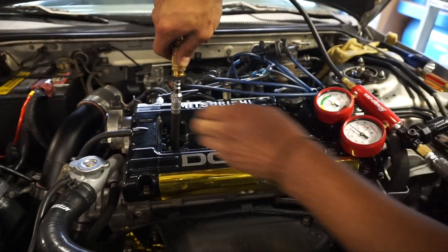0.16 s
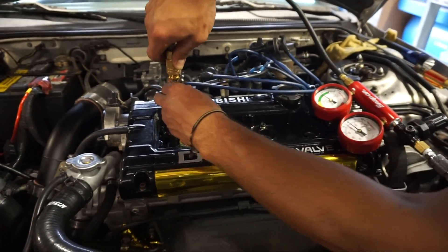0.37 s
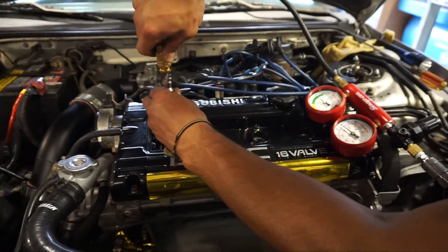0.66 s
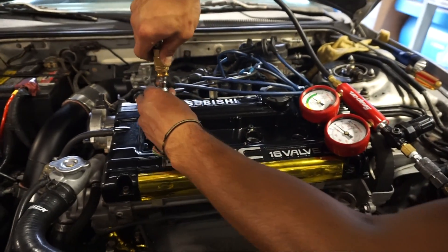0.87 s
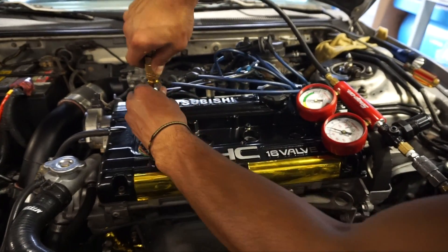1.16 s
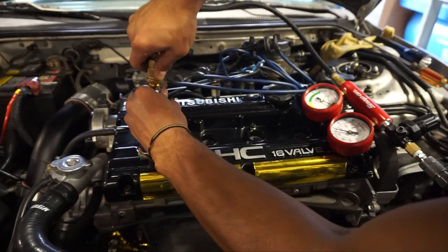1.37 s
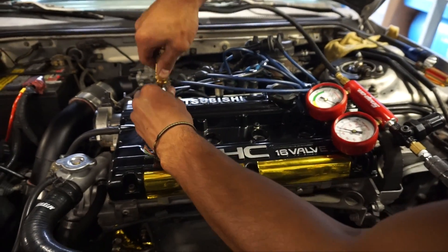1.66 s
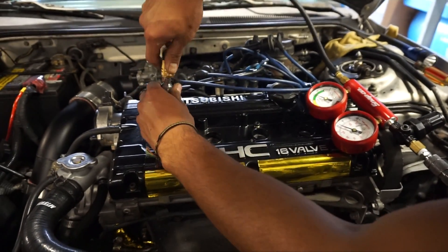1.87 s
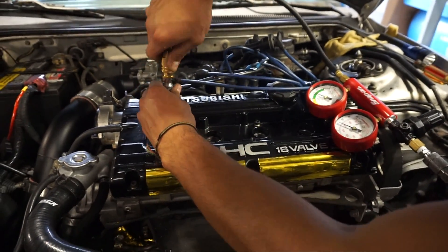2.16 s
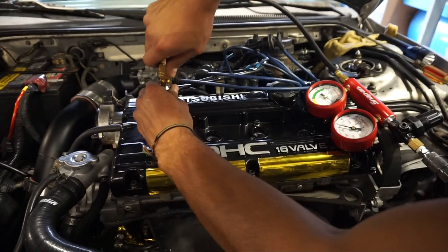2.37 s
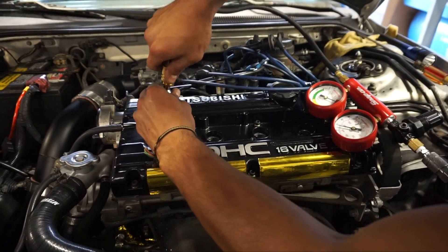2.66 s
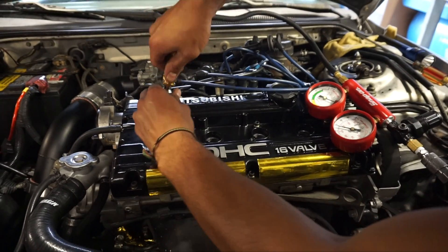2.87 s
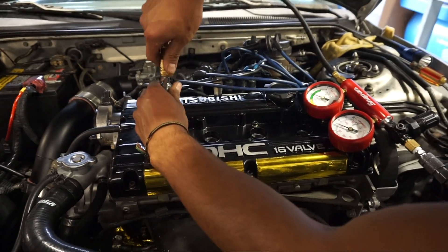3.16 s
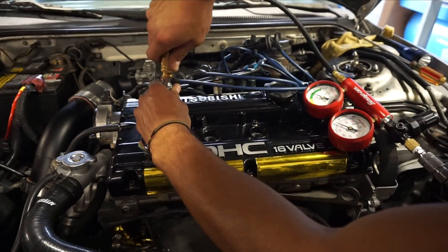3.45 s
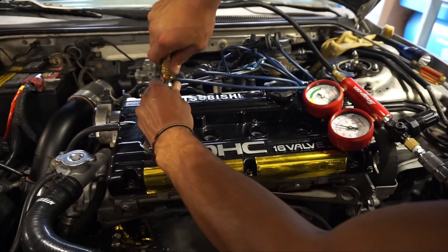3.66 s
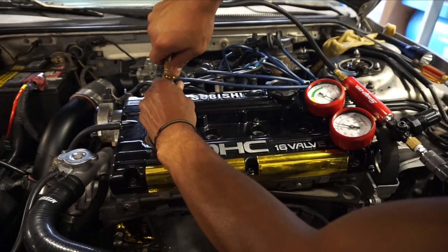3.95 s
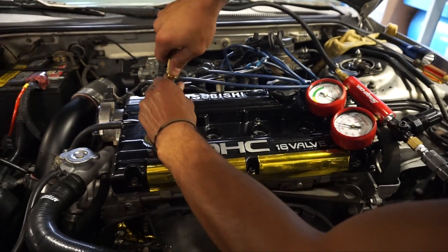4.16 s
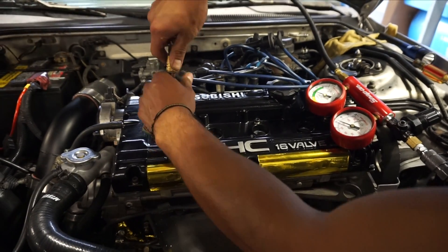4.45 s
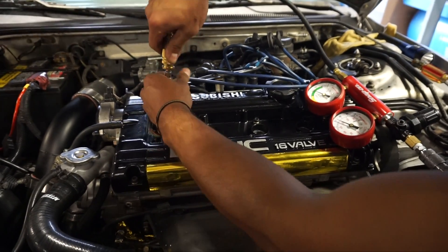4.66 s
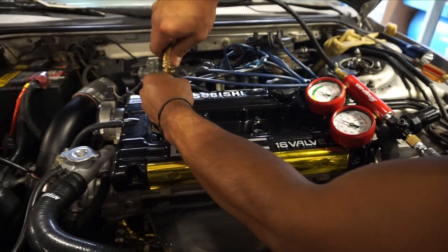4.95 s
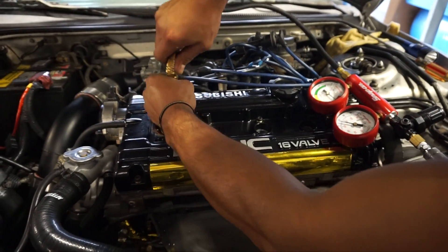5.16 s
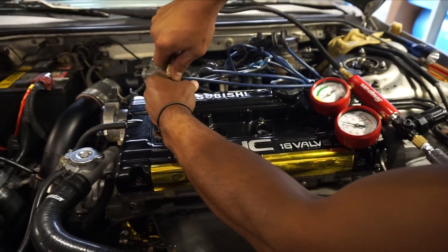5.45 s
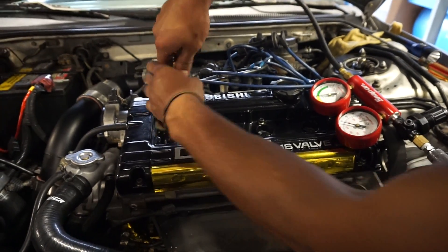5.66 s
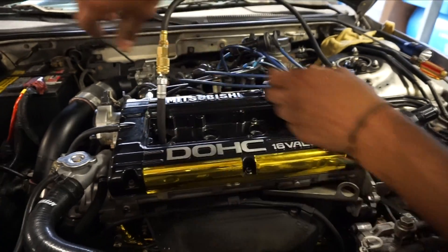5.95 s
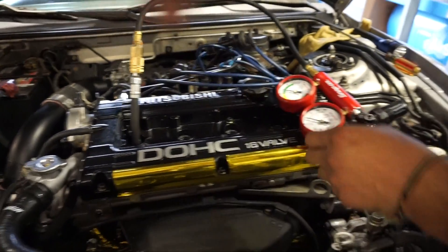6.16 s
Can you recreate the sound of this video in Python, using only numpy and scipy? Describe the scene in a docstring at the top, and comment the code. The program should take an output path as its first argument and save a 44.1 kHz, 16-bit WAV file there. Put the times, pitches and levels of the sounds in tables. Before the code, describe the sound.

In a workshop, a compressor drones steadily while fingers click a brass air coupler close to the microphone. Compressed air bursts out five times, the first two almost joined, the next two longer, the last very short. Crisp metallic ticks fall between the bursts. The first hiss makes the recording level drop, so the drone stays low afterwards. Each hiss ends abruptly with a light workshop echo.

```python
"""Air hose coupler in a workshop

Close to the microphone, fingers work the brass quick coupler of a leak-down tester's hose: it clicks
(filtered noise scrapes) and air escapes in five bursts (shaped noise), the first two almost joined.
Behind it a compressor drones: shaft tones over throbbing noise, with mains hum and a faint leak.
The first burst makes an automatic gain control turn down, so the drone drops away and stays low."""
import sys
import numpy as np
from scipy import signal
from scipy.fft import rfft, irfft, next_fast_len
from scipy.io import wavfile
from scipy.ndimage import uniform_filter1d, minimum_filter1d, map_coordinates

SR = 44100
rng = np.random.default_rng(int(sys.argv[2]) if len(sys.argv) > 2 else 0)


def file_out(sig):
    """Save sig as 16-bit WAV at sys.argv[1]."""
    # one column per channel
    cols = np.atleast_2d(sig).T
    # limit, then scale
    lim = np.clip(cols, -1, 1)
    pcm = np.round(lim * 32767).astype(np.int16)
    wavfile.write(sys.argv[1], SR, pcm)


N = 277697
TIME = np.arange(N) / SR
FFT_SIZE = next_fast_len(N, True) // 2 * 2
FREQS = np.fft.rfftfreq(FFT_SIZE, 1 / SR)
EDGE_HZ = 15800  # upper band limit
SIDES = np.array([[.5], [-.5]])  # shares a left-right difference between the two channels

# clicks and scrapes of the coupler: t/s, level/dB, brightest f/Hz, decay/s
CLICKS = [(.536, -35, 9000, 0.032), (.584, -22, 5760, .0089), (0.8183, -10.5, 4450, 0.0033),
          (0.8196, -19, 13000, .0038), (.951, -24.5, 6700, .0097), (1.043, -24, 12000, .005),
          (1.055, -12, 8500, 0.0063), (1.0594, -5.5, 5330, 0.0046), (2.008, -24, 7000, .005),
          (2.101, -24.5, 8050, .011), (2.113, -17, 10000, .005), (2.135, -26, 11000, .007),
          (2.2116, -19, 7000, 0.0063), (2.224, -26, 11000, .0057), (3.167, -27, 10000, 0.0043),
          (3.226, -26, 13500, 0.0082), (3.258, -14.5, 15000, 0.0045), (3.284, -13.5, 10000, 0.0037),
          (3.3185, -23, 10000, 0.0028), (4.357, -23, 9000, .006), (4.69, -30, 9000, .004),
          (4.874, -25, 6640, .0044), (4.9062, -25, 15000, .003), (5.452, -16.5, 9600, 0.0027)]


def gain_of(db):
    """Amplitude factor of a level in dB."""
    return 10 ** (np.asarray(db) / 20)


def evened(x):
    """The signal scaled to rms 1."""
    return x / np.sqrt(np.mean(x ** 2) + 1e-20)


def read(points, hz):
    """A table of (f/Hz, value) joined on a log-frequency axis."""
    f, value = np.transpose(points)
    return np.interp(np.log(hz + 1), np.log(f + 1), value)


def follow(points):
    """A table of (t/s, value) joined by straight lines at every sample."""
    s, value = np.transpose(points)
    return np.interp(TIME, s, value)


def peaks(modes, hz):
    """Summed gain of steep-sided resonances: f/Hz, width/Hz, level/dB."""
    return sum(gain_of(db) / (1 + ((hz - f) / width * 2) ** 2) ** 1.5 for f, width, db in modes)


def waver(hz):
    """Slow random curve of rms 1, moving at up to about the given rate."""
    spectrum = rfft(rng.standard_normal(N), FFT_SIZE)
    return evened(irfft(spectrum / (1 + (FREQS / hz) ** 4))[:N])


def noise(density):
    """Two partly alike channels of noise with the given amplitude per root Hz."""
    # left-right likeness: f/Hz, likeness 0-1
    likeness = [(25, .5), (70, 1), (250, 1), (700, 0.94), (1200, 0.65), (4000, 0.43), (5300, 0.04),
                (6600, 0.48), (9500, 0.61), (11500, 0.35), (13500, 0.44), (15500, 0.41)]
    a, b = rfft(rng.standard_normal((2, FFT_SIZE)))
    same = read(likeness, FREQS)
    pair = np.array([a, same * a + np.sqrt(1 - same ** 2) * b])
    return irfft(pair * density)[:, :N] * np.sqrt(SR / 2)


def air(flicker_db=0.56, rush_flicker_db=0.5, split_hz=12500):
    """Escaping air: a shrill turbulent jet and a broad rush, part of which sounds through the hose."""
    # thin jet of the air: f/Hz, level/dB per Hz
    jet_colour = [(200, -100), (1200, -76), (2600, -69.5), (4700, -60), (6200, -63), (8000, -49),
                  (9500, -47), (11800, -42), (13300, -42.5), (14900, -40), (17500, -73)]
    # broad rush of the air: f/Hz, level/dB per Hz
    rush_colour = [(100, -95), (600, -89), (1200, -72), (2000, -62.5), (2800, -58), (4000, -54),
                   (4700, -54.5), (6500, -52), (9000, -53), (16000, -83)]
    # resonances of the hose: f/Hz, width/Hz, level/dB per Hz
    hose_modes = [(1220, 230, -61.5), (2080, 370, -56), (2625, 260, -47), (3140, 370, -48),
                  (3810, 170, -45.5), (4300, 300, -47), (4735, 120, -42), (5390, 410, -45),
                  (5800, 160, -49.5), (6390, 540, -46.5), (7330, 170, -42), (8010, 280, -39.5),
                  (8500, 150, -40), (9400, 200, -39), (10800, 240, -48)]
    # bands the hose cancels: f/Hz, width/Hz, depth/dB
    hose_notches = [(3560, 200, -28), (4030, 90, -8), (4980, 170, -15), (6850, 550, -11), (7680, 170, -6),
                    (9150, 260, -5)]
    # how much of the air sounds through the hose: t/s, share 0-1
    hose_share = [(1.29, 1), (1.37, .05), (3.72, .03), (3.93, .65), (4.1, .15), (4.3, .05)]
    flow, pinch_db, tilt_db = gap()
    hollow = follow(hose_share)
    through_hose, direct = np.sqrt(hollow), np.sqrt(1 - hollow)
    notches = gain_of(sum(db * np.exp(-2 * ((FREQS - f) / width) ** 2) for f, width, db in hose_notches))

    shrill = gain_of(read(jet_colour, FREQS))
    jet = direct * noise(shrill) + through_hose * noise(shrill * notches)
    high_pass = signal.butter(2, split_hz, "high", fs=SR, output="sos")
    top = signal.sosfiltfilt(high_pass, jet)
    tilt = gain_of(tilt_db / 2)
    jet = top * tilt + (jet - top) / tilt

    rush = direct * noise(gain_of(read(rush_colour, FREQS)))
    rush = rush + through_hose * noise(peaks(hose_modes, FREQS) * notches)
    jet = jet * gain_of(pinch_db + flicker_db * waver(60))
    rush = rush * gain_of(rush_flicker_db * waver(40))
    return hand_echoes(flow * (jet + rush))


def gap():
    """Flow, pinch/dB and tilt/dB: a narrow gap makes a strong shrill jet, a wide one a duller jet."""
    # each time the coupler lets air out: opens t/s, shuts t/s, attack/s, flow level/dB,
    # pinch on opening/dB, pinch lasts/s, pinch on shutting/dB, gap widest t/s, widening 0-1
    bursts = [(1.147, 1.325, 0.002, 5, 6.5, .016, -0.5, 1.19, 0.4),
              (1.333, 1.797, 0.0024, 1.5, 9.5, 0.086, -0.5, 1.67, 0.66),
              (2.309, 3.011, 0.0028, 0, 17.5, .06, 3.5, 2.8, 0.13),
              (3.593, 4.319, .0026, -2.5, 10, 0.21, 5.5, 3.99, 1),
              (5.088, 5.217, 0.0054, 2, 14, .045, -3, 5.195, 1)]
    release_s = 0.004  # how fast the seal shuts
    shutting_s = 0.036  # spread of the pinch around the moment of shutting
    spit_lead_s, spit_s, spit_db = .019, 0.0034, -31  # thin spit as the seal first lifts
    wide_share, wide_flow_db = 0.18, -1  # spread of the widening as share of a burst; its flow change
    narrow_tilt_db = 2  # top of the jet over its lower part, with a narrow gap
    wide_tilt_db = -13.5  # change of that tilt at full widening
    flow, pinch_db, widening = np.zeros((3, N))
    for opens, shuts, attack_s, flow_db, opening_db, pinch_s, shutting_db, widest, width in bursts:
        opened = (1 + np.tanh((TIME - opens) / (2 * attack_s))) / 2
        unshut = (1 + np.tanh((shuts - TIME) / (2 * release_s))) / 2
        swell = np.exp(-((TIME - widest) / (wide_share * (shuts - opens))) ** 2)
        wide = width * opened * unshut * swell
        spit = gain_of(spit_db) * np.exp(-((TIME - opens + spit_lead_s) / spit_s) ** 2)
        flow += opened * unshut * gain_of(flow_db + wide_flow_db * wide) + spit
        away = np.maximum((TIME - opens) / pinch_s, (opens - TIME) / spit_lead_s)
        pinch_db += opening_db * np.exp(-away)
        pinch_db += shutting_db * np.exp(-((TIME - shuts) / shutting_s) ** 2)
        widening += wide
    return flow, pinch_db, narrow_tilt_db + wide_tilt_db * widening


def hand_echoes(x, drift=0.072):
    """Close reflections comb the hiss; the colour shifts as the hand moves and the delays drift."""
    # echoes off the hand and the valve cover: mean delay/ms, level/dB
    echoes = [(0.211, -29), (1.369, -12.5), (2.3, -9)]
    at, out = np.arange(N), x.copy()
    for ms, db in echoes:
        late = at - ms * SR / 1000 * (1 + drift * waver(1.2))
        out += gain_of(db) * np.array([map_coordinates(ear, [late], order=2) for ear in x])
    return out


def seal(seated_s=5.22, fade_s=.28):
    """Short dull puffs of noise past the seal, and a dying narrow-band whistle once it has seated."""
    # the seal spits as it shifts or seats: t/s, level/dB, length/s
    puff_times = [(1.292, -2, .018), (1.357, 10, 0.0054), (1.777, 0, 0.02), (2.994, 4, 0.021),
                  (4.307, -2.5, 0.017)]
    # colour of a puff: f/Hz, level/dB per Hz
    puff_colour = [(40, -100), (200, -70), (600, -55), (1300, -55.5), (3200, -47.5), (4500, -49),
                   (8000, -60), (16000, -75)]
    # thin whistle of the seated seal: f/Hz, width/Hz, level/dB per Hz
    whistle_modes = [(11980, 480, -60), (13150, 700, -69)]
    puffs = sum(gain_of(db) * np.exp(-2 * ((TIME - s) / length) ** 2) for s, db, length in puff_times)
    seep = (TIME > seated_s) * np.exp(-abs(TIME - seated_s) / fade_s)
    return puffs * noise(gain_of(read(puff_colour, FREQS))) + seep * noise(peaks(whistle_modes, FREQS))


def coupler(octaves=0.76, rise_s=0.0012, grit_db=1.5, body_db=-9, snap=2.4, snap_s=0.00023):
    """Each click is a snap and a short gritty scrape that ring the brass sleeve."""
    # resonances of the brass sleeve: f/Hz, width/Hz, level/dB
    brass_modes = [(2750, 340, 20), (3850, 520, 16.5), (4500, 580, 8.5), (6830, 450, 10), (7300, 310, 11),
                   (8080, 590, 10), (9200, 270, 9), (10490, 300, 10.5), (12930, 700, 12), (13700, 900, 7)]
    size = 4096  # samples per click
    t, hz = np.arange(size) / SR, np.fft.rfftfreq(size, 1 / SR)
    out = np.zeros((2, N + size))
    for s, db, bright_hz, decay in CLICKS + rattles():
        shared, left, right, grit = rng.standard_normal((4, size))
        contact = 1 / (1 + (np.log2((hz + 1) / bright_hz) / octaves) ** 2)
        contact += gain_of(body_db) * (4000 / bright_hz) ** 2  # dull blows also shake the body
        low_cut = hz ** 2 / (hz ** 2 + 600 ** 2)
        colour = (1 + peaks(brass_modes, hz)) * contact * low_cut * (hz < EDGE_HZ)
        ring = evened(irfft(rfft(shared + 1.04 * np.array([left, right])) * colour))
        roughness = gain_of(grit_db * evened(uniform_filter1d(grit, 40)))
        scrape = (1 - np.exp(-t / rise_s)) * np.exp(-t / decay) * roughness
        attack = snap * np.exp(-t / snap_s) * (bright_hz / 14000) ** 2  # bright clicks snap harder
        start = round(s * SR)
        out[:, start:start + size] += gain_of(db) * ring * (scrape + attack)
    return out[:, :N]


def rattles(after_s=(0.0076, 0.022), below_db=-13.5, bright_hz=10000, decay_s=0.0045):
    """The loose sleeve ticks once, weaker, at a random moment after each click; rows like CLICKS."""
    return [(s + rng.uniform(*after_s), db + below_db, bright_hz, decay_s) for s, db, _, _ in CLICKS]


def bumps(rise_s=0.0021):
    """Soft knocks as the hose bumps the engine: quickly damped sines."""
    # knocks of the hose: t/s, level/dB, f/Hz, decay/s
    knocks = [(.553, -53, 75, .02), (3.253, -32, 131, .02), (3.28, -19, 338, 0.013)]
    out = np.zeros(N)
    for s, db, hz, decay in knocks:
        t = np.maximum(TIME - s, 0)
        envelope = np.exp(-t / decay) * (1 - np.exp(-t / rise_s))
        out += gain_of(db) * np.sin(2 * np.pi * hz * t) * envelope
    return out


def workshop(x):
    """A diffuse tail for each ear, each band dying at its own speed."""
    # decay of the workshop: f/Hz, t60/s
    decay_times = [(200, 0.75), (2000, 1), (6000, 0.89), (15000, 0.38)]
    late_noise = rng.standard_normal((2, SR)) * (TIME[:SR] > .008)  # the tail starts after 8 ms
    hz, t, z = signal.stft(late_noise, SR, nperseg=256)
    fading = gain_of(-60 * t / read(decay_times, hz)[:, None])
    tail = signal.istft(z * fading, SR, nperseg=256)[1]
    return signal.fftconvolve(x, tail / np.linalg.norm(tail[0]), axes=1)[:, :N]


def compressor(shaft_hz=56.8, wander=0.00144, throb=0.058, knock=0.089, lean_db=-4.0, tones_lean_db=-2.5):
    """Shaft tones, the fourth steady and strong, over a clatter that throbs with the strokes."""
    # tones of the compressor: multiple of the shaft speed, rms level/dB
    shaft_tones = [(2, -57), (3, -50), (4, -30), (5, -45.5), (6, -50.5), (7, -49), (8, -38.5), (9, -70),
                   (10, -38), (11, -51), (12, -45), (13, -61), (14, -56), (17, -51.5), (35, -51.5),
                   (43, -53.5), (50, -52.5), (68, -55.5), (70, -54)]
    # clatter of air and casing: f/Hz, level/dB per Hz
    clatter_colour = [(25, -101), (55, -93), (84, -90), (106, -61), (145, -66.5), (200, -67), (380, -65.5),
                      (640, -59.5), (900, -68.5), (1500, -68.5), (2400, -72), (2850, -67.5), (3500, -75),
                      (3950, -76.5), (4600, -81.5), (8000, -91)]
    angle = 2 * np.pi * np.cumsum(shaft_hz * (1 + wander * waver(3.1))) / SR
    tones = np.zeros(N)
    for order, db in shaft_tones:
        flutter = .051 if order == 4 else .255  # rms share of the tone's level
        level = np.sqrt(2) * gain_of(db) * (1 + flutter * waver(9.4))
        tones += level * np.cos(order * angle + 2 * np.pi * rng.random())
    strokes = 1 + throb * np.cos(4 * angle) + knock * (np.cos(angle) + np.cos(2 * angle))
    clatter = evened(strokes) * noise(gain_of(read(clatter_colour, FREQS)))
    return tones * gain_of(tones_lean_db * SIDES) + clatter * gain_of(lean_db * SIDES)


def mains_hum(mains_hz=120, rms_db=-54):
    """A plain sine hum, equal in both channels."""
    return np.sqrt(2) * gain_of(rms_db) * np.sin(2 * np.pi * mains_hz * TIME)


def tester_leak():
    """The faint leak of the tester: a soft noise floor."""
    # colour of the leak: f/Hz, level/dB per Hz
    leak_colour = [(60, -115), (1000, -87), (5000, -91), (8000, -85), (12000, -81.5), (14000, -81),
                   (16000, -88)]
    return noise(gain_of(read(leak_colour, FREQS)))


def scene(room_db=-23):
    """The coupler close by, its echo in the workshop, and the background swelling and sinking behind."""
    # swell of the whole background: t/s, level/dB
    drone_swell = [(0, 1), (.45, -1.5), (.8, .7), (1.05, 5), (1.7, 4.5), (2.28, 0.5), (2.85, 4.5), (3.4, 3),
                   (3.57, 0), (3.9, 2.5), (4.5, 2.5), (4.75, -2), (5.05, -1), (5.25, 3), (5.7, -2),
                   (6.3, 2)]
    near = air() + seal() + coupler() + bumps()
    background = gain_of(follow(drone_swell)) * (compressor() + mains_hum() + tester_leak())
    return near + gain_of(room_db) * workshop(near) + background


def record(dry, lead_us=11, ceiling_db=-16, ratio=11, hold_db=11, release_db_per_s=150):
    """Two unlike microphone ports; a quick gain control that recovers only part way; the band limit."""
    # balance of the ports: f/Hz, left minus right level/dB
    port_balance = [(120, 3.5), (250, 2), (700, -1.5), (1400, 0), (2200, -2), (3700, 0), (6000, 1.5),
                    (9000, 0), (11000, -2), (12200, -0.5), (13800, -3.5), (16000, -6)]
    lead = np.exp(2j * np.pi * FREQS * lead_us * 1e-6 * SIDES)  # left ahead of right
    lean = gain_of(read(port_balance, FREQS) * SIDES) * lead
    ports = irfft(rfft(dry, FFT_SIZE) * lean * (FREQS < EDGE_HZ + 500))[:, :N]

    power = uniform_filter1d((ports ** 2).mean(0), size=600)
    power_db = 10 * np.log10(abs(power) + 1e-12)
    over_db = np.maximum(power_db - ceiling_db, 0) * (1 - 1 / ratio)
    fall = TIME * release_db_per_s
    quick_db = np.maximum.accumulate(over_db + fall) - fall
    lasting_db = minimum_filter1d(over_db, size=1400)  # a brief click does not latch the gain down
    held_db = np.minimum(np.maximum.accumulate(lasting_db), hold_db)
    reduction_db = uniform_filter1d(np.maximum(quick_db, held_db), size=200)
    ducked = ports / gain_of(reduction_db)

    low_pass = signal.firwin(701, EDGE_HZ, window=("kaiser", 8), fs=SR)
    return signal.oaconvolve(ducked, low_pass[None], "same")


dry = scene()
out = record(dry)
file_out(out)
```